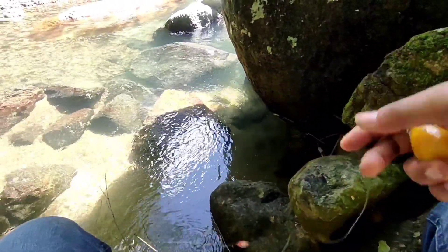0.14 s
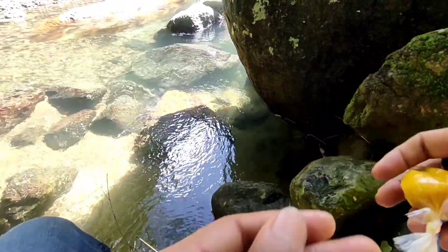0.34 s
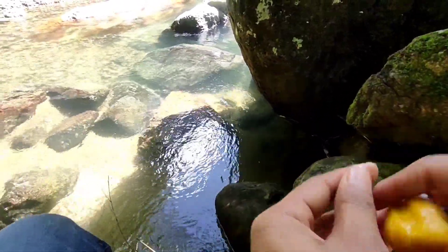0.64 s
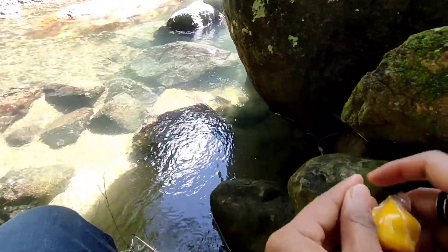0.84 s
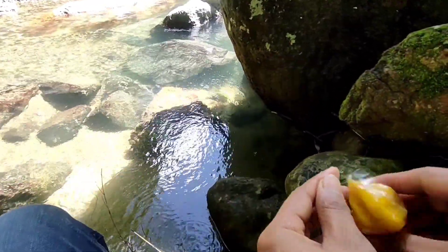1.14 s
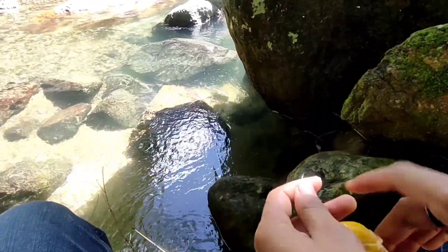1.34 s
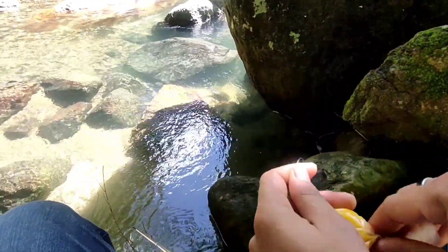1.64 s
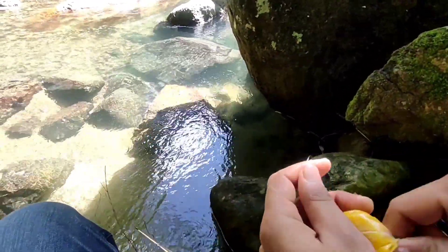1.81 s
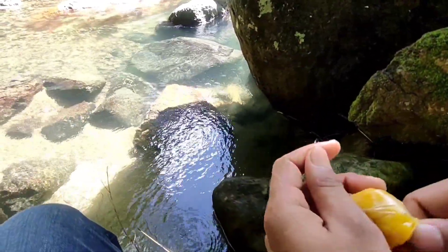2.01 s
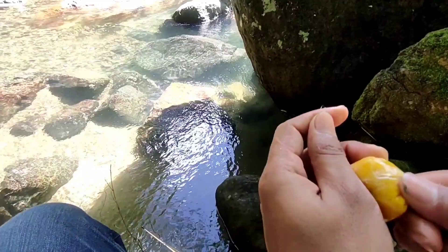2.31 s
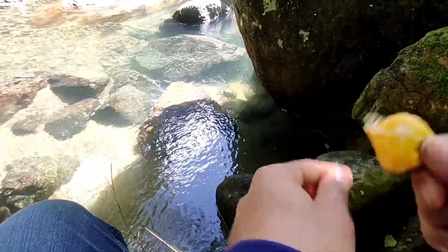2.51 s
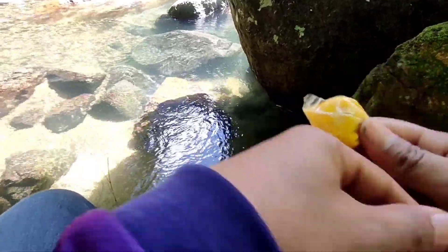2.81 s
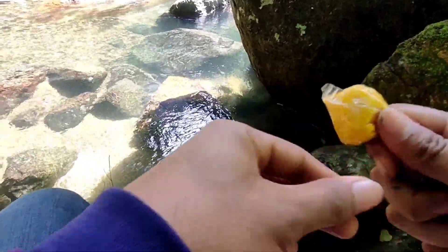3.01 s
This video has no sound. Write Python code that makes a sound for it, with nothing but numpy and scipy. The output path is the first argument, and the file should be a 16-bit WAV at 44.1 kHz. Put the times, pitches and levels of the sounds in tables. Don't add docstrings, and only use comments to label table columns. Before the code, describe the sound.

Steady bubbling stream water over rocks, with crisp snaps of thin plastic film handled up close.

```python
import sys
import numpy as np
from scipy import signal
from scipy.fft import rfft, irfft, next_fast_len
from scipy.io import wavfile
from scipy.ndimage import uniform_filter1d, map_coordinates

SR = 44100
rng = np.random.default_rng(int(sys.argv[2]) if len(sys.argv) > 2 else 0)


def convert_level_to_amplitude(level_db):
    exponent = np.asarray(level_db, float) / 20
    return 10 ** exponent


def to_wav(sig):
    pcm = np.clip(np.atleast_2d(sig), -1, 1) * 32767
    pcm = np.round(pcm).astype(np.int16)
    wavfile.write(sys.argv[1], SR, pcm.T)


N = 138915

# t/s, level/dB
STREAM_FLOW = [
    (0.0, -28),
    (1.02, -26.5),
    (2.04, -27.5),
    (2.91, -27),
    (3.15, -27.5),
]
# f/Hz, level/dB
WATER_COLOUR = [(25, -20.5), (60, -4), (200, -1), (550, 1.5), (1500, -3.5), (3400, -9), (6000, -18.5),
                (16000, -18.5)]
# f/Hz, likeness (0 to 1)
PORT_LIKENESS = [(70, .4), (300, .92), (620, .68), (930, .35), (1200, .65), (1600, .38), (2250, .62),
                 (3600, .15)]
# t/s, peak level/dB, f/Hz
GLUG_EVENTS = [(0.068, -29.5, 193.5), (0.284, -17, 980), (0.352, -15.5, 984), (.385, -21, 358),
               (0.436, -15, 1360), (0.625, -22, 334), (.754, -22.5, 534), (0.916, -19, 426),
               (0.938, -16, 1120), (.953, -19, 534), (1.242, -22.5, 533), (1.336, -19.5, 2264),
               (1.398, -28, 464), (1.7, -24.5, 337), (2.248, -21, 338), (2.296, -21.5, 316),
               (2.571, -25, 220), (2.585, -19, 710), (2.64, -27, 207), (2.79, -16, 1330), (2.853, -21, 525),
               (2.885, -19, 295), (2.965, -14.5, 1026), (3.028, -20, 560), (0.154, -23, 2230),
               (.22, -17.5, 1530), (.263, -27, 335), (.268, -23, 1780), (0.333, -19, 1284),
               (.381, -20, 2100), (.4, -23.5, 371), (.54, -28, 1830), (0.667, -21.5, 400),
               (.694, -24.5, 550), (0.788, -26, 2670), (.85, -24, 360), (.878, -20, 645),
               (0.938, -14, 1260), (0.944, -18.5, 400), (.982, -23.5, 2270), (1.062, -21.5, 2580),
               (1.092, -22, 2100), (1.204, -20, 974), (1.205, -21.5, 546), (1.237, -18, 2830),
               (1.24, -20.5, 2270), (1.239, -29, 227), (1.389, -22, 1240), (1.745, -23, 2120),
               (1.879, -30, 2120), (2.009, -20.5, 2000), (2.032, -19, 985), (2.07, -23, 2520),
               (2.64, -19, 706), (2.775, -20.5, 542), (2.904, -20, 1350), (2.925, -21, 580),
               (3.125, -23, 445), (.6, -25, 542), (1.5, -20.5, 758)]
# t/s, level/dB
HISS_LEVEL = [
    (0, -53),
    (1, -53),
    (2.2, -55),
    (2.5, -43.5),
    (3.15, -46),
]
# t/s, level/dB
FINGER_EFFORT = [(0, -82.5), (.35, -59), (.385, -49.5), (.5, -66), (.54, -47.5), (.86, -50.5), (.92, -44.5),
                 (1.08, -59), (1.31, -57), (1.36, -51), (1.57, -53.5), (1.93, -48), (2.12, -50.5),
                 (2.235, -37), (2.27, -46.5), (2.4, -44.5), (2.55, -54), (3.15, -57)]
# t/s, peak level/dB, left over right level/dB
CREASE_SNAPS = [(0.3832, -19.5, 1), (0.5385, -17.5, 6), (0.5519, -21, 8), (0.62, -20.5, -12),
                (0.7029, -18, -3), (0.7117, -15, 10), (0.7514, -16, 12), (0.772, -20, 5), (0.7951, -15, 11),
                (0.897, -26, 3), (0.9084, -25, 5), (0.915, -19, 3), (0.9228, -11, 1), (0.9262, -19, -1),
                (0.9364, -13, -10), (1.4364, -23, -18), (1.6787, -16, 3), (1.7039, -18, -0.5),
                (1.79, -37, 4), (1.818, -13, 3), (1.8479, -13, 5.5), (1.91, -18.5, 1), (1.9273, -13.5, -3),
                (2.167, -20, -1), (2.1779, -19, -7), (2.2085, -19, 2), (2.231, -16, 7), (2.2499, -7.5, 2),
                (2.341, -19, -5.5), (2.3854, -31, -9), (2.2468, -20, -3), (2.4255, -14.5, 7),
                (2.649, -12.5, 1), (.3721, -36, 0), (.8739, -23, 0), (.9009, -29, 0), (1.069, -30, -3),
                (1.1995, -20, 2), (1.3125, -27, -16), (1.6152, -30, -8), (1.6242, -17.5, 0),
                (1.805, -20, -4), (1.8372, -21, 0), (1.8851, -22, -2), (1.8906, -21, -6), (1.962, -27, -2),
                (1.9804, -23, 4), (2.104, -25, 6), (2.1291, -20, 0), (2.217, -19, 0), (2.238, -15, 0),
                (2.2735, -22, -5), (2.4355, -19, -11), (2.635, -25, 4), (3.1243, -17, 0)]
# f/Hz, level/dB
FILM_COLOUR = [(700, -41), (2500, 3.5), (3600, -3), (6500, -8), (9000, -3), (12000, -6.5), (15400, -7),
               (16000, -24.5)]
# t/s, peak level/dB, f/Hz, left over right level/dB
WIND_PUFFS = [
    (.68, -41, 49.5, 9),
    (0.861, -40, 59, 19),
    (0.919, -36, 45, 6),
    (1.065, -32.5, 64, -21),
    (1.108, -38, 77, -18),
    (2.49, -32, 75, 3),
    (2.824, -36, 55, 16),
]
# f/Hz, width/Hz, left level/dB, right level/dB
FAR_RESONANCES = [(864, 54, -2, 4), (996, 148, 5, -4.5), (1314, 92, 5.5, 5), (2266, 63, -4, 5),
                  (4018, 155, -28.5, -26.5), (4510, 670, -6.5, -6.5), (6390, 920, 8.5, 6.5),
                  (8574, 940, -3, 11.5), (9280, 170, -14, 2), (11020, 2150, -7, -4.5),
                  (13340, 1300, -7.5, -4.5), (15800, 470, 1, -31), (1, 8, -26, -11), (6190, 480, -0.5, -4),
                  (202.5, 11, 3, 2.5), (250, 32, -2, -0.5), (600, 62, 2, 1.5), (10940, 450, 6, -2),
               (480, 24, 1, -3.5), (806, 57, -3, 2.5)]
# f/Hz, width/Hz, left level/dB, right level/dB
NEAR_CAVITIES = [(4093, 180, -5, -3.5), (6720, 1400, 11, 3.5), (8390, 710, -2, 11),
                 (11000, 1700, -3.5, -0.5), (13100, 560, 2, -1.5), (14700, 610, -1, 1)]
# f/Hz, level/dB
WEAKEST_STORED = [(3000, -65.5), (4000, -65.5), (5100, -63), (9000, -64), (10300, -65), (12500, -68.5),
                  (14700, -69), (15800, -60)]
# t/s, level/dB
THRESHOLD_DRIFT = [(0, -1.5), (.5, -1), (1.5, 0), (2.3, 0), (3.15, .5)]

FLOW_DB = 1
LAG_S = 0.0004593
FROTH_DB, FROTH_RATE, FROTH_HZ, FROTH_OCTAVES, FROTH_CYCLES = -7, 420, 925, 1.132, 9.7
FIZZ_DB, FIZZ_RATE, FIZZ_HZ, FIZZ_OCTAVES, FIZZ_CYCLES = -8, 900, 2770, 0.583, 7.7
RISE, GLUG_RISE = .2, .07
GLUG_DB, GLUG_CYCLES, GLUG_HZ = 2.5, 15, 500
HISS_HZ, HISS_WIDTH_HZ = 14110, 370
CRINKLE_RATE, CRINKLE_SPREAD_DB = 360, 3.5
CRINKLE_DB, RUSTLE_DB, SNAP_DB = 8, 6.5, 4.5
AIR_DB, AIR_HZ = 6.5, 11700
SNAP_T60_S, SNAP_RISE_S = .006, .001
MASK_FROM_HZ, MASK_TO_HZ, MASK_DB = 9900, 13500, -2.5
FRAME_SHIFT, TOP_HZ = 484, 15840


def unit(x):
    return x / np.sqrt(np.mean(x ** 2) + 1e-20)


def along(points, hz):
    f, v = np.transpose(points)
    return np.interp(np.log(hz + 1), np.log(f + 1), v)


def curve(rows):
    s, v = np.transpose(rows)
    return np.interp(np.arange(N) / SR, s, v)


def wobble(rate):
    knots = rng.standard_normal(int(N * rate / SR) + 4)
    return map_coordinates(knots, [np.arange(N) * rate / SR])


def filtered(x, response):
    m = next_fast_len(N + 8192)
    return irfft(rfft(x, m) * response(np.fft.rfftfreq(m, 1 / SR)), m)[..., :N]


def rush(patchy_db):
    z = signal.stft(rng.standard_normal((2, N)), nperseg=512)[2]
    patches = uniform_filter1d(rng.standard_normal(z.shape[1:]), 5, 0)
    patches = uniform_filter1d(patches, 10, 1)
    pair = signal.istft(z * convert_level_to_amplitude(patchy_db * unit(patches)), nperseg=512)[1][:, :N]
    return unit(filtered(pair, lambda hz: convert_level_to_amplitude(along(WATER_COLOUR, hz))))


def bubbles(start_s, hz, gain, cycles, size, rise=RISE):
    turns = np.arange(size) / SR * hz[:, None] / cycles
    ring = np.sin(2 * np.pi * cycles * turns * (1 + rise * turns / 2))
    wave = gain[:, None] * ring * convert_level_to_amplitude(-26 * turns) * (1 - np.exp(-turns / 0.042))
    at = (start_s * SR).astype(int)[:, None] + np.arange(size)
    return np.bincount(at.ravel(), wave.ravel(), N + size)[:N]


def swarm(rate, hz, octaves, cycles, spread_db, size):
    u = rng.random((int(rate * N / SR), 4))
    bell = np.sqrt(-2 * np.log(1 - u[:, 1])) * np.cos(2 * np.pi * u[:, 2])
    pitch = hz * 2 ** (octaves * bell)
    pitch = np.maximum(pitch, 300 * 300 / pitch)
    gain = convert_level_to_amplitude(-spread_db * np.log(1 - .97 * u[:, 3]))
    return unit(bubbles(u[:, 0] * N / SR, np.clip(pitch, 100, 6000), gain, cycles, size))


def froth():
    middling = swarm(FROTH_RATE, FROTH_HZ, FROTH_OCTAVES, FROTH_CYCLES, spread_db=-1.5, size=900)
    tiny = swarm(FIZZ_RATE, FIZZ_HZ, FIZZ_OCTAVES, FIZZ_CYCLES, spread_db=3.5, size=160)
    return convert_level_to_amplitude(FROTH_DB) * middling + convert_level_to_amplitude(FIZZ_DB) * tiny


def glugs():
    s, db, hz = np.transpose(GLUG_EVENTS)
    cycles = GLUG_CYCLES * np.sqrt(np.maximum(hz / GLUG_HZ, 1))[:, None]
    return bubbles(s, hz, convert_level_to_amplitude(db + GLUG_DB), cycles, size=4000, rise=GLUG_RISE)


def stream():
    flow = convert_level_to_amplitude(curve(STREAM_FLOW) + FLOW_DB + .4 * wobble(9))
    pair = flow * (rush(patchy_db=1) + np.array([froth(), froth()]))
    pair[0] += glugs()

    def likeness(hz):
        turn = np.arccos(np.clip(along(PORT_LIKENESS, hz), 0, 1)) / 2
        return np.array([np.cos(turn), np.sin(turn)])

    def lag(hz):
        low = (hz > 0) & (hz < 800)
        return np.exp(1j * (.25 * low - np.pi * hz * LAG_S) * np.array([[1], [-1]]))

    mid, side = filtered(pair, likeness)
    return filtered(np.array([mid + side, mid - side]), lag)


def insect_hiss():
    noise = rng.standard_normal((2, N))
    band = filtered(noise, lambda hz: np.exp(-.5 * ((hz - HISS_HZ) / HISS_WIDTH_HZ) ** 4))
    return convert_level_to_amplitude(curve(HISS_LEVEL)) * unit(band)


def crinkles(noise):
    u = rng.random((int(CRINKLE_RATE * N / SR), 2))
    strength = convert_level_to_amplitude(-CRINKLE_SPREAD_DB * np.log(1 - .98 * u[:, 1]))
    kicks = np.bincount((u[:, 0] * N).astype(int), strength, N)
    decay = convert_level_to_amplitude(-120 * np.arange(400) / SR / 0.0036)
    gate = np.sqrt(np.abs(signal.fftconvolve(kicks ** 2, decay)[:N]))
    return convert_level_to_amplitude(CRINKLE_DB) * unit(gate) * unit(noise)


def rustle(noise):
    tilt = lambda hz: convert_level_to_amplitude(AIR_DB * np.clip(np.log2(hz / AIR_HZ + .5), -1, 1))
    return convert_level_to_amplitude(RUSTLE_DB + 2.6 * wobble(29.75)) * unit(filtered(noise, tilt))


def snaps(noise):
    t = np.arange(400) / SR
    shape = np.zeros((2, N + len(t)))
    for s, db, pan_db in CREASE_SNAPS:
        start = round(s * SR)
        level = db + SNAP_DB - 60 * t / SNAP_T60_S + pan_db * np.array([[.5], [-.5]])
        shape[:, start:start + len(t)] += convert_level_to_amplitude(level) * (1 - np.exp(-t / SNAP_RISE_S))
    local_power = np.abs(uniform_filter1d(noise ** 2, size=60))
    return shape[:, :N] * noise / np.sqrt(local_power + 1e-12)


def bag():
    noise = filtered(rng.standard_normal((3, 2, N)), lambda hz: convert_level_to_amplitude(along(FILM_COLOUR, hz)))
    return convert_level_to_amplitude(curve(FINGER_EFFORT)) * (crinkles(noise[0]) + rustle(noise[1])) + snaps(noise[2])


def wind_puffs():
    s, db, hz, pan_db = np.transpose(WIND_PUFFS)
    return np.array([bubbles(s, hz, convert_level_to_amplitude(db + 3 + side * pan_db / 2), 5, size=8000) for side in (1, -1)])


def ports(table):
    def response(hz):
        gain_db = 0
        for centre, width, left, right in table:
            gain_db = gain_db + np.array([[left], [right]]) * np.exp(-.5 * ((hz - centre) / width) ** 2)
        return convert_level_to_amplitude(gain_db)
    return response


def scene():
    far = filtered(stream() + wind_puffs(), ports(FAR_RESONANCES))
    return far + insect_hiss() + filtered(bag(), ports(NEAR_CAVITIES))


def thinned(x):
    frames = dict(nperseg=2048, noverlap=1024, window="cosine")
    hz, _, z = signal.stft(np.pad(x, ((0, 0), (FRAME_SHIFT, 0))), SR, **frames)
    power = np.abs(z) ** 2
    band = np.repeat(uniform_filter1d(power, size=6, axis=1)[:, 2::4], repeats=4, axis=1)
    waver = uniform_filter1d(rng.standard_normal(power[:, 2::4].shape), size=3, axis=2)
    waver = np.repeat(waver, repeats=4, axis=1)
    band = np.pad(band * convert_level_to_amplitude(4.5 * waver), ((0, 0), (0, 1), (0, 0)))
    drift_db = np.interp(np.arange(power.shape[2]) * 1024 / SR, *np.transpose(THRESHOLD_DRIFT))
    least = convert_level_to_amplitude(2 * (along(WEAKEST_STORED, hz)[:, None] + drift_db))
    masked = (hz > MASK_FROM_HZ) & (hz < MASK_TO_HZ)
    nearby = uniform_filter1d(power, size=80, axis=1)
    least = np.maximum(least, masked[:, None] * nearby * convert_level_to_amplitude(2 * MASK_DB))
    strong_band = uniform_filter1d(band, size=2, axis=2) > least
    strong_line = power > least * convert_level_to_amplitude(-3)
    kept = strong_band & strong_line & (hz < TOP_HZ)[:, None]
    return signal.istft(z * kept, SR, **frames)[1][:, FRAME_SHIFT:][:, :N]


def low_pass(x):
    return signal.sosfilt(signal.butter(12, 15850, fs=SR, output="sos"), x)


def record(dry):
    mix = thinned(dry)
    return low_pass(mix)


dry = scene()
out = record(dry)
to_wav(out)
```